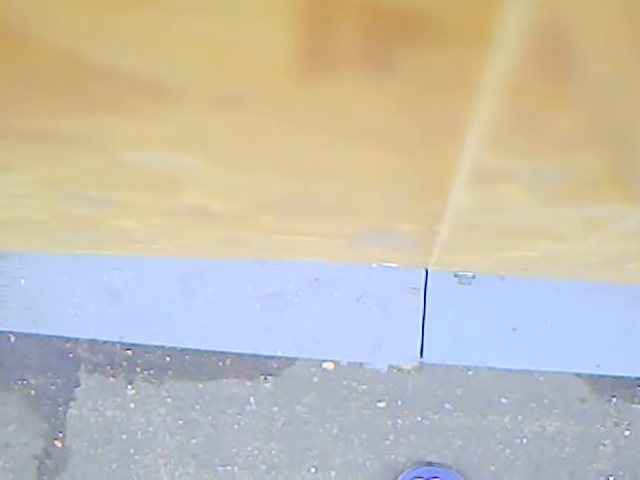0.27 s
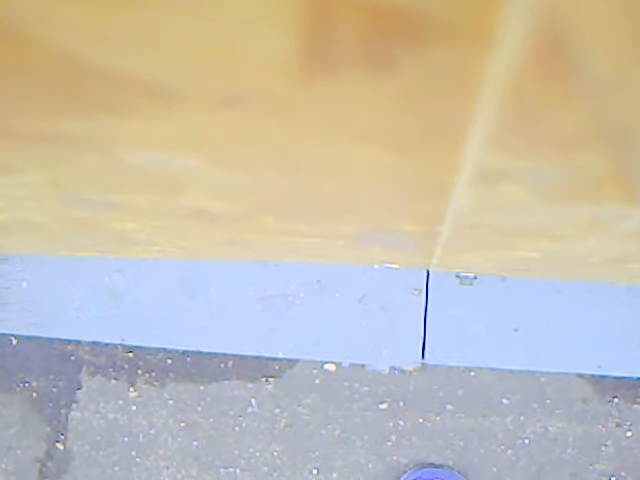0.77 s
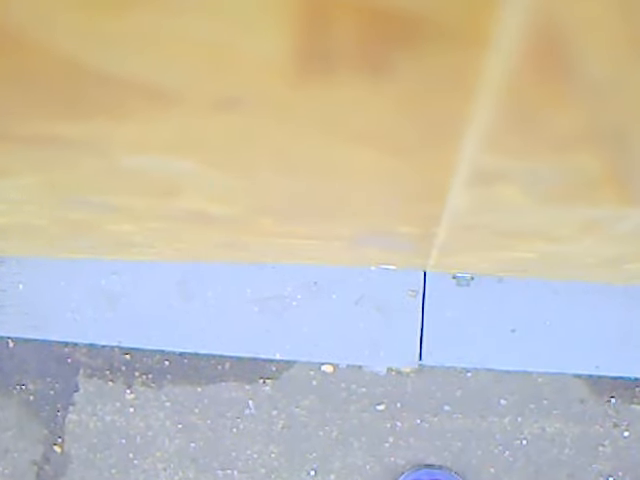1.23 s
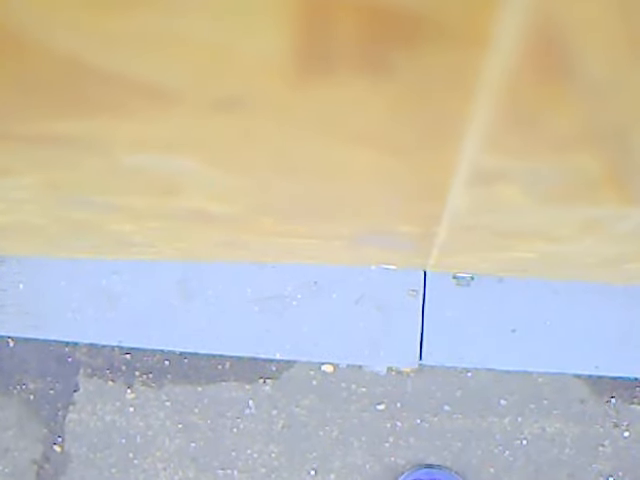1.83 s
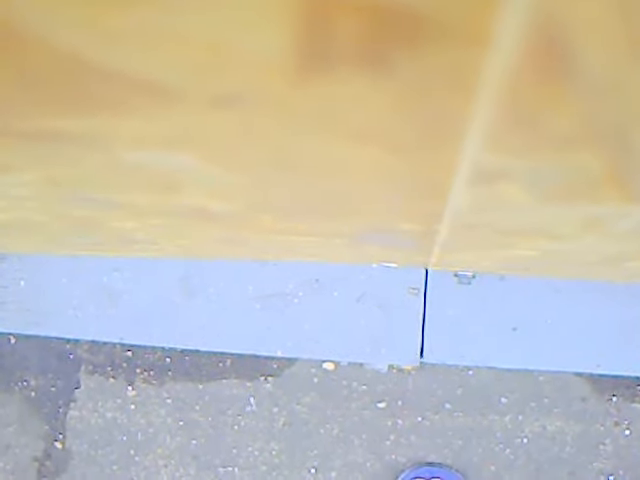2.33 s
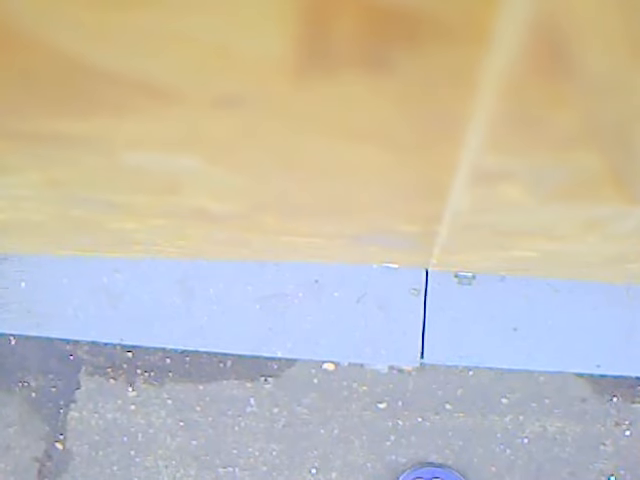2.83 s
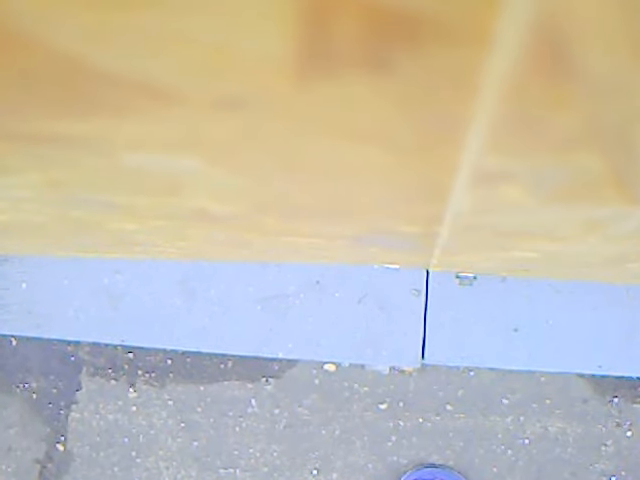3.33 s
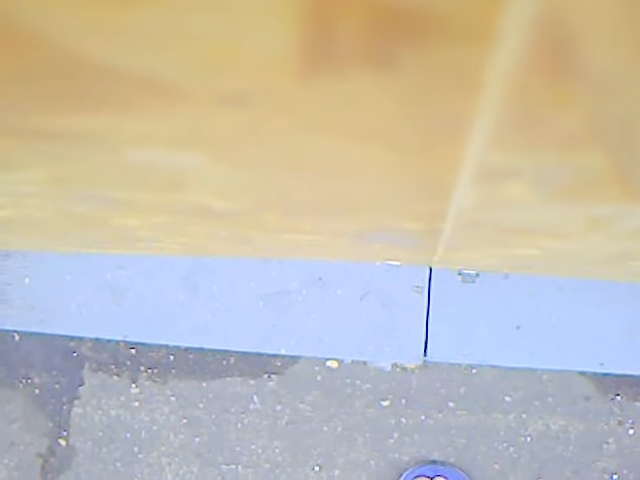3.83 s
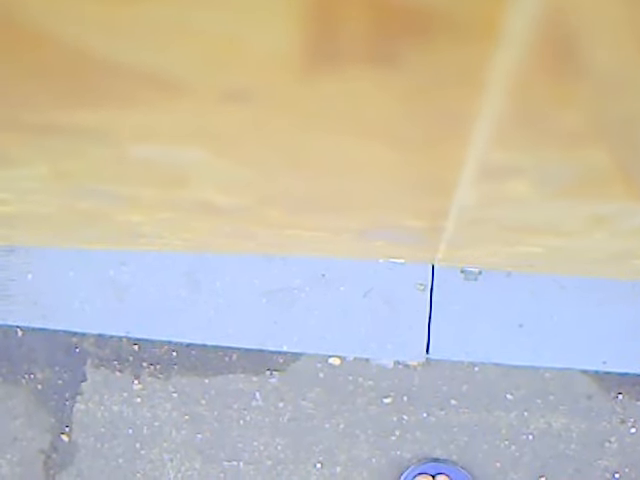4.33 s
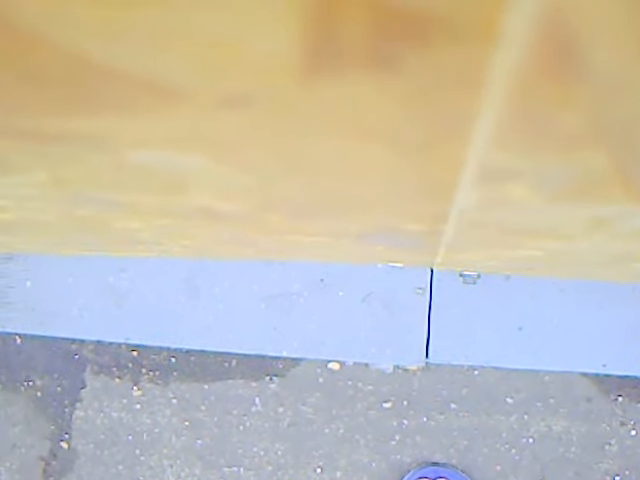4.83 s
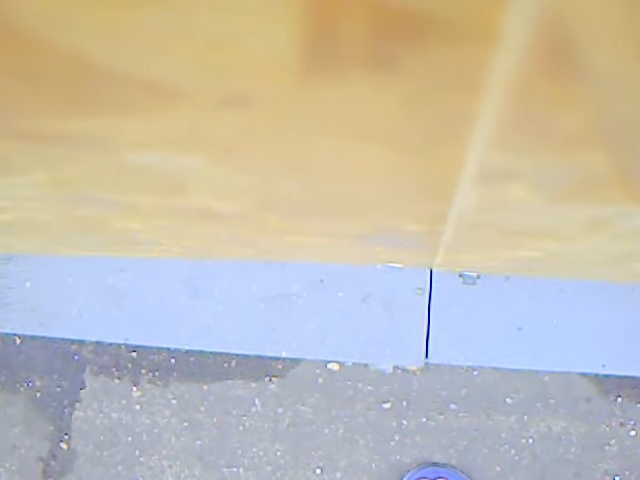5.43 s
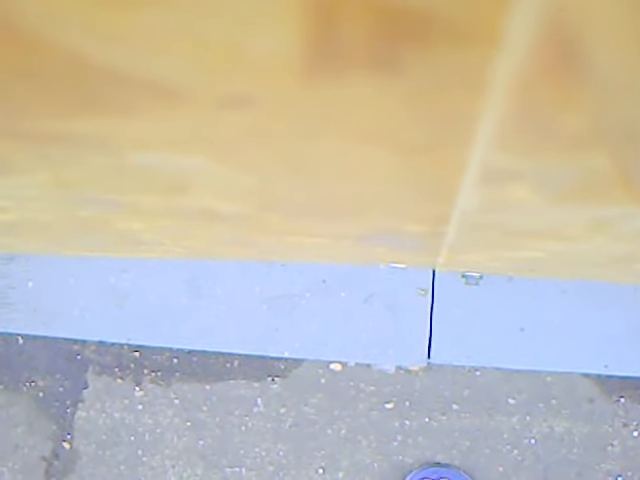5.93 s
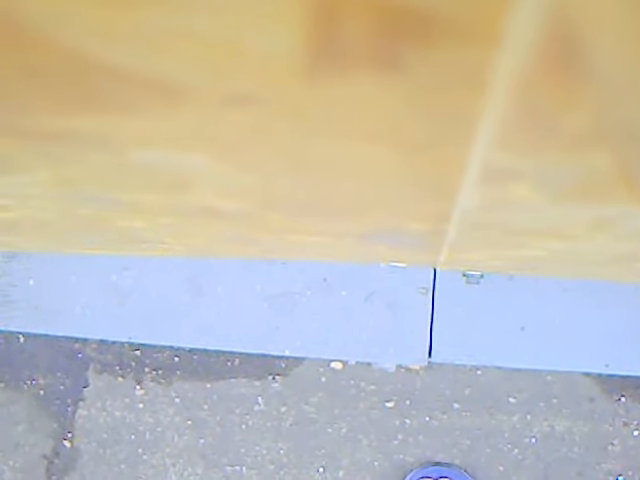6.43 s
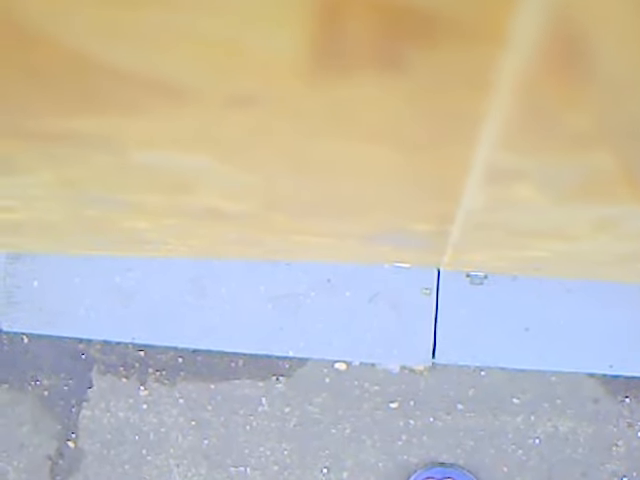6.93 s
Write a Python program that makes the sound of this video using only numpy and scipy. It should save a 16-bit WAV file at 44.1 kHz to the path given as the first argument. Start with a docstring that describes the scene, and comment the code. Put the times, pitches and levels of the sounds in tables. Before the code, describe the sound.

A steady low machine drone fills an outdoor spot, buzzing and fluttering quickly, its electric hum swelling and sagging. Clattering valves, soft blowing air and a thin hiss lie around it, the hiss rising slightly midway. Small dry clicks sound close to the microphone early on. After seven seconds of drone, a loud heavy bang with rattling fittings breaks in.

```python
"""A piston air compressor drones outdoors near a workplace, its pump tones throbbing against a motor's hum.
Sines on multiples of the pump cycle make the drone; one looped turn of noise makes the valve clatter.
Near the end something heavy knocks shut: damped panel modes thud, and noise bursts crunch and rattle.
Close to the microphone come a small tick and then a double one, each a few short damped modes.
Behind lie coloured noises: pulsing cooling air, a thin hiss that surges twice and outdoor rumble."""
import sys
import numpy as np
from scipy import signal
from scipy.fft import rfft, irfft
from scipy.io import wavfile
from scipy.ndimage import uniform_filter1d

SR = 44100
rng = np.random.default_rng(int(sys.argv[2]) if len(sys.argv) > 2 else 0)


def persist_wave(psi):
    """Save psi, clipped to +-1, as 16-bit WAV."""
    counts = np.round(np.clip(psi, -1, 1) * 32767).astype(np.int16)
    wavfile.write(sys.argv[1], SR, np.atleast_2d(counts).T)


N = 317079  # length in samples

PUMP_HZ = 14.252  # pump cycles per second
# pump and tank tones: cycle_multiple, rms_db
PUMP_ORDERS = [(1, -51.5), (4, -42), (5, -47), (6, -39), (7, -37), (9, -38.5), (10, -51), (12, -39.5),
               (13, -43), (14, -48), (15, -45.5), (16, -38), (17, -48.5), (20, -52.5), (21, -55),
               (23, -56.5), (24, -53.5), (25, -48.5), (26, -54), (31, -57), (34, -54.5), (35, -60.5),
               (46, -56), (58, -59.5), (66, -55.5), (81, -60.5), (86, -57.5), (105, -63), (112, -60.5)]
# valve and housing clatter spectrum: freq_hz, density_db_per_hz
CLATTER_SPECTRUM = [(200, -87), (400, -77.5), (600, -77), (950, -75), (1200, -79), (1350, -84), (1600, -76),
                    (2100, -93), (2600, -95.5), (3250, -87.5), (4100, -99.5), (4600, -108), (9000, -125)]

HUM_HZ = 60.17
# motor hum harmonics: hum_multiple, relative_level_db
HUM_ORDERS = [(1, -15), (2, 0), (3, -17), (5, -43)]
# slow swell and sag of the hum: time_s, level_db
HUM_LEVEL = [(0.0, -22.5), (0.2, -34), (0.45, -24.5), (0.8, -26), (1.15, -35.5), (1.45, -25), (2.05, -24.0),
             (2.85, -24.5), (3.07, -31), (3.3, -22.8), (3.6, -26.1), (4.05, -22.5), (4.4, -27), (5.38, -24),
             (5.6, -31.5), (5.9, -29), (6.5, -30.5), (6.8, -37.5)]
# a pump tone lies just under the hum's second harmonic, and the two throb
THROB_HZ = 5.865  # beats per second
THROB_S, THROB_DB = 0.13, -37  # time of the first swell, rms level of that pump tone
# other steady machine tones: pitch_hz, rms_db
SIDE_TONES = [(27.1, -40.5), (49.1, -53), (68.1, -55), (196.6, -44), (343.8, -48.5)]
# bearing whine: pitch_hz, rms_db
WHINE_TONES = [(3090, -68.5), (3774, -78), (3849, -80), (4050, -82.5), (4129, -74), (4231, -75),
               (7596, -94), (7655, -86.5), (7709, -81)]

# blows of the heavy knock: start_s, thud_db, crunch_db, rattle_db
BLOWS = [(6.991, -3.5, -3, -23), (7.002, -7.5, -3, -3), (7.016, -3, -5.5, -4.5), (7.044, -16, -5, -8),
         (7.063, -20, -8, -9), (7.101, -9.5, -10, -22)]
# ringing panel modes: pitch_hz, level_db (relative to the thud), t60_s
PANEL_MODES = [(66.2, -21.5, 0.39), (87, -18, 0.21), (150, -18, 0.19), (166, -16.5, 0.098),
               (215.5, -25, 0.2), (318, -32.5, 0.35), (954, -37, 0.63), (1386, -41, .3), (1780, -42, 0.33),
               (2240, -40, 0.34)]
# crunch of the panel, at a blow of 0 dB: freq_hz, density_db_per_hz
CRUNCH_SPECTRUM = [(80, -55.5), (300, -53), (700, -63.5), (1100, -60.5), (2350, -69.5), (2800, -75),
                   (4200, -86), (9000, -115)]
# bright rattle of the panel's fittings, at a blow of 0 dB: freq_hz, density_db_per_hz
RATTLE_SPECTRUM = [(1500, -87), (3000, -78), (4600, -82), (5800, -82), (7400, -84), (8150, -80.5),
                   (8700, -92), (9700, -87.5), (11000, -103)]

# small close contacts: start_s, level_db, contact_s
TICKS = [(.1733, -15, 0.00008), (2.1236, -10.5, 0.00013), (2.1266, -14, 0.00013)]
# what the ticks ring with: pitch_hz, level_db (relative to the tick), t60_s
TICK_MODES = [(900, -21, .005), (2350, -6, 0.0026), (3460, -5, 0.0026), (5800, -2, 0.0018)]

# rush of cooling air: freq_hz, density_db_per_hz
AIR_SPECTRUM = [(100, -86), (300, -66), (500, -67.5), (650, -74.5), (1050, -71.5), (1350, -76),
                (1650, -77.5), (2200, -79), (2550, -86), (3300, -85), (4000, -92), (4500, -101),
                (7000, -112), (11000, -125)]
# thin hiss, before its trim and surges: freq_hz, density_db_per_hz
HISS_SPECTRUM = [(2500, -115), (4400, -104), (4880, -96), (5200, -100), (5900, -96.5), (6600, -101),
                 (7400, -102), (7950, -99), (8500, -103), (9600, -106), (11000, -113)]
HISS_TRIM_DB = -1.33
# surges of the hiss: peak_s, rise_s, lift_db, settle_s (time to fall to 1/e of the lift in dB)
HISS_SURGES = [(3.06, .22, 2.6, .08), (3.68, .09, 3.3, 4.5)]
# outdoor rumble: freq_hz, density_db_per_hz
RUMBLE_SPECTRUM = [(8, -73.5), (22, -48), (50, -55), (78, -53), (95, -64.5), (120, -65), (155, -58),
                   (180, -53), (220, -61.5), (260, -70), (400, -81.5), (1500, -120)]

TOP_HZ = 11050  # upper edge of what the camera's microphone keeps


def pump(turns, waver_db=1.5, stroke_depth=0.24, scatter_db=-0.5):
    """Pressure pulses drone in the tank; the valves repeat one clatter, loudest on a cycle's two strokes."""
    drone = sum(tone(round(k) * turns, db + waver_db * walk(6.5)) for k, db in PUMP_ORDERS)
    # one turn of clatter: random phases, no harmonic much stronger than its neighbours
    size = int(SR / PUMP_HZ)
    phases = np.exp(2j * np.pi * rng.random(size // 2 + 1))
    strengths = undb(2 * rng.standard_normal(size // 2 + 1))
    one_turn = irfft(phases * strengths)
    one_turn /= one_turn.std()
    clatter = np.interp(turns % 1, np.linspace(0, 1, len(one_turn)), one_turn)
    strokes = 1 + stroke_depth * np.cos(4 * np.pi * turns)
    scatter = undb(scatter_db * walk(30))
    return drone + colour(clatter * strokes * scatter, CLATTER_SPECTRUM)


def motor(clock, waver_db=2.5, slip_turns=0.092, hum_waver_db=1.0):
    """Electric hum throbs against a pump tone, deepest where it sags; side tones and a thin whine join."""
    level_db = curve(HUM_LEVEL) + hum_waver_db * walk(6)
    turns = HUM_HZ * clock + rng.random()
    hum = sum(sine(round(k) * turns, db + level_db) for k, db in HUM_ORDERS)
    # locked to the hum's phase so that the first swell falls at THROB_S
    throb = sine(2 * turns - THROB_HZ * (clock - THROB_S), THROB_DB)
    machine_tones = sum(tone(hz * clock + slip_turns * walk(3.6), db + waver_db * walk(6))
                        for hz, db in SIDE_TONES + WHINE_TONES)
    return hum + throb + machine_tones


def knock(crunch_t60=0.26, rattle_t60=0.25, echo_t60=1.1, echo_db=-9, grain_db=1.0):
    """A heavy panel hits and rebounds: modes thud, fittings rattle, and the yard answers in a slow tail."""
    t = np.arange(N) / SR
    thud, crunch_power, rattle_power = np.zeros(N), np.zeros(N), np.zeros(N)
    for start, thud_db, crunch_db, rattle_db in BLOWS:
        after = t >= start
        age = t[after] - start
        for hz, db, t60 in PANEL_MODES:
            detune = 1 + 0.0162 * rng.standard_normal()
            decay = undb(thud_db + db - 60 * age / t60)
            thud[after] += decay * np.sin(2 * np.pi * hz * detune * age)
        # the powers of successive blows add up
        echo = undb(echo_db) * fade(start, echo_t60)
        crunch_power += undb(2 * crunch_db) * (fade(start, crunch_t60) ** 2 + echo ** 2)
        rattle_power += undb(2 * rattle_db) * fade(start, rattle_t60) ** 2
    # many small contacts make the decay uneven
    grain = undb(grain_db * walk(400))
    crunch = colour(np.sqrt(crunch_power) * grain * rng.standard_normal(N), CRUNCH_SPECTRUM)
    rattle = colour(np.sqrt(rattle_power) * grain * rng.standard_normal(N), RATTLE_SPECTRUM)
    return thud + crunch + rattle


def ticks():
    """Tiny hard contacts ring a few damped modes, rounded by the time each contact lasts."""
    t = np.arange(N) / SR
    out = np.zeros(N)
    for start, db, contact in TICKS:
        ring = sum(undb(mode_db) * fade(start, t60) * np.sin(2 * np.pi * hz * (t - start))
                   for hz, mode_db, t60 in TICK_MODES)
        push = np.exp(-2 * (np.arange(-16, 17) / SR / contact) ** 2)
        out += undb(db) * np.convolve(ring, push / push.sum(), "same")
    return out


def cooling_air(turns, pulse_depth=0.064):
    """Turbulent cooling air, noise that pulses once per pump cycle."""
    flow = 1 + pulse_depth * np.cos(2 * np.pi * turns)
    return colour(rng.standard_normal(N) * flow, AIR_SPECTRUM)


def hiss():
    """A thin noise that surges twice and settles back, at once the first time and slowly the second."""
    t = np.arange(N) / SR
    lift_db = np.zeros(N)
    for peak, rise, db, settle in HISS_SURGES:
        climb = np.clip(1 + (t - peak) / rise, 0, 1)
        lift_db += db * climb * np.exp(-np.maximum(t - peak, 0) / settle)
    return colour(rng.standard_normal(N), HISS_SPECTRUM) * undb(HISS_TRIM_DB + lift_db)


def rumble(gust_db=0.5):
    """Low outdoor noise whose level wanders slightly."""
    return colour(rng.standard_normal(N), RUMBLE_SPECTRUM) * undb(gust_db * walk(4.03))


def undb(db):
    """Decibels to gain."""
    return 10 ** (np.asarray(db) / 20)


def sine(turns, db):
    """A sine of the given rms level."""
    return np.sqrt(2) * undb(db) * np.sin(2 * np.pi * turns)


def tone(turns, db):
    """A sine with a chance starting phase."""
    return sine(turns + rng.random(), db)


def curve(rows):
    """Rows of time_s, value joined by straight lines."""
    return np.interp(np.arange(N) / SR, *np.transpose(rows))


def walk(rate):
    """Smooth random wander with a spread near 1, from `rate` random steps per second."""
    size = int(SR / rate)
    steps = np.repeat(rng.standard_normal(N // size + 1), size)
    return 1.34 * uniform_filter1d(uniform_filter1d(steps, size), size)[:N]


def fade(start, t60):
    """An exponential decay of 60 dB per t60 seconds that begins at the given time."""
    age = np.arange(N) / SR - start
    return (age >= 0) * np.exp(-np.log(1000) * np.clip(age / t60, 0, 10))


def colour(x, points):
    """Give a white signal of rms 1 the spectrum (Hz, dB per Hz) through a causal minimum-phase filter."""
    size = 2 ** 19
    hz, db = np.transpose(points)
    log_hz = np.log(np.fft.rfftfreq(size, 1 / SR) + 1)
    log_gain = np.interp(log_hz, np.log(hz), np.log(undb(db)))
    # folding the cepstrum onto positive times makes the filter causal
    cepstrum = irfft(log_gain)
    cepstrum[1:size // 2] *= 2
    cepstrum[size // 2 + 1:] = 0
    response = np.exp(rfft(cepstrum))
    return irfft(rfft(x, size) * response)[:N] * np.sqrt(SR / 2)


def scene():
    """The machine and its surroundings at one microphone."""
    t = np.arange(N) / SR
    # the belt lets the pump run a hair early or late
    turns = PUMP_HZ * (t + 0.00008 * walk(3.01))
    clock = t + 0.00003 * walk(1.4)
    machine = pump(turns) + motor(clock)
    background = cooling_air(turns) + hiss() + rumble()
    return (machine + knock() + ticks() + background)[None]


def record(dry):
    """The camera cuts the top with a steep low-pass."""
    low_pass = signal.ellip(10, 0.2, 70, TOP_HZ, fs=SR, output="sos")
    return signal.sosfilt(low_pass, dry)


dry = scene()
out = record(dry)
persist_wave(out)
```